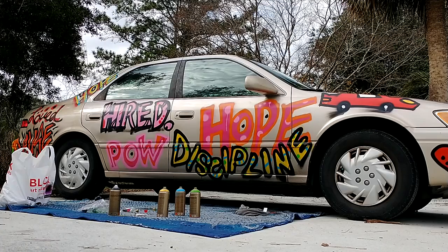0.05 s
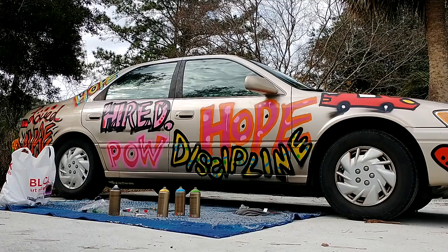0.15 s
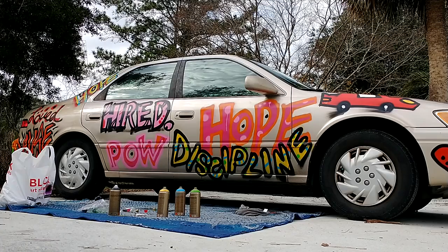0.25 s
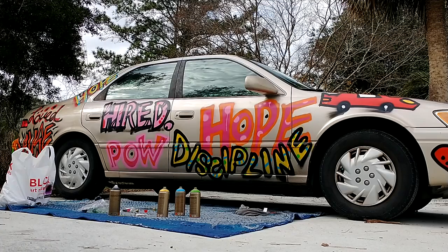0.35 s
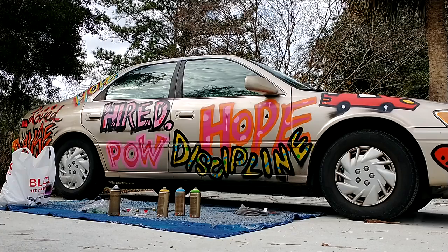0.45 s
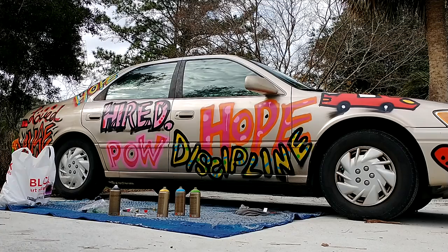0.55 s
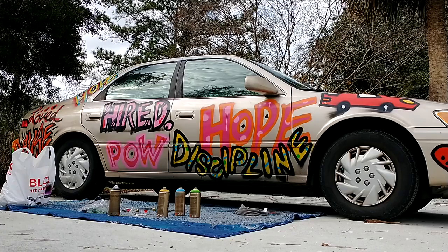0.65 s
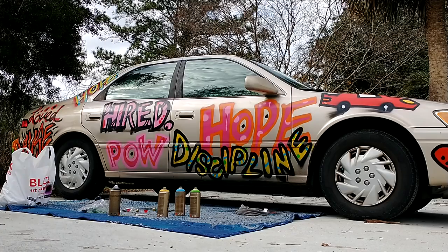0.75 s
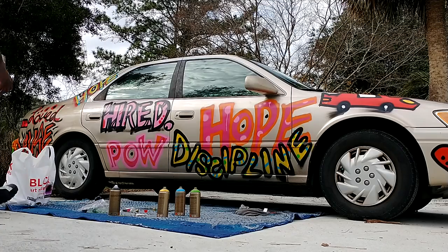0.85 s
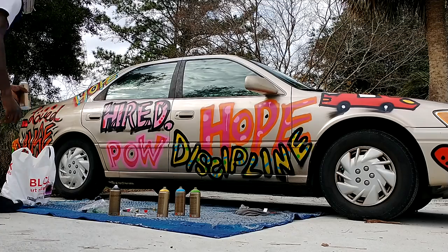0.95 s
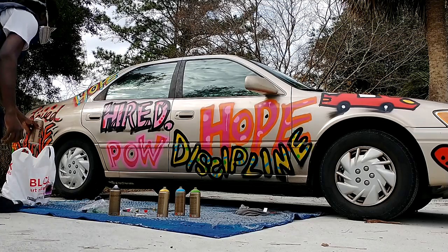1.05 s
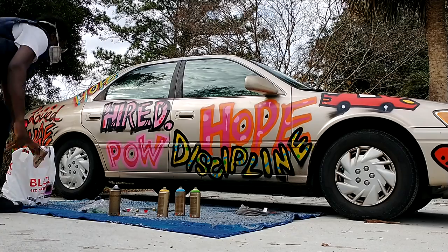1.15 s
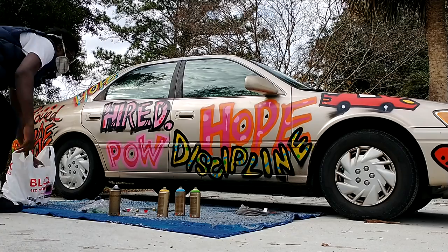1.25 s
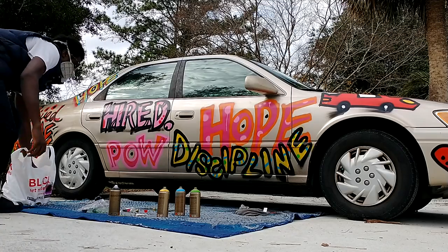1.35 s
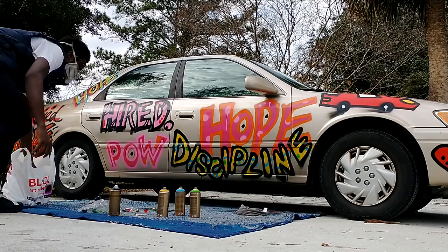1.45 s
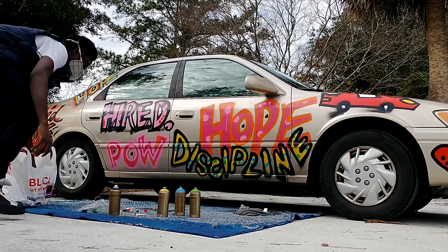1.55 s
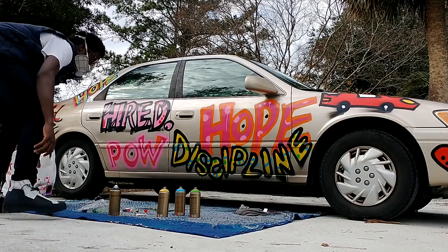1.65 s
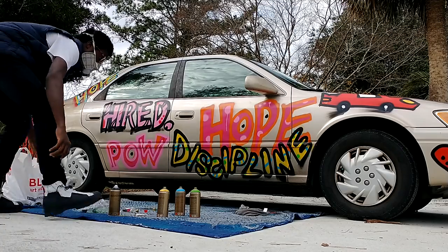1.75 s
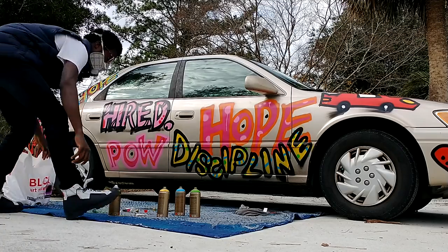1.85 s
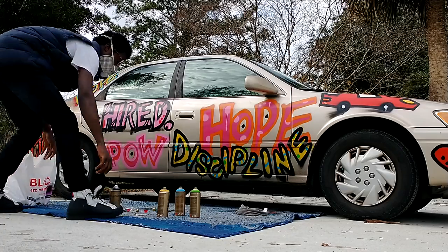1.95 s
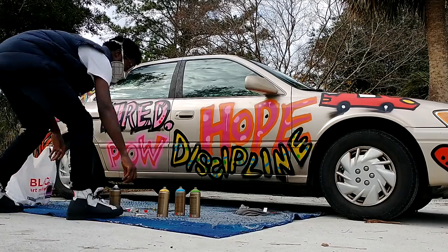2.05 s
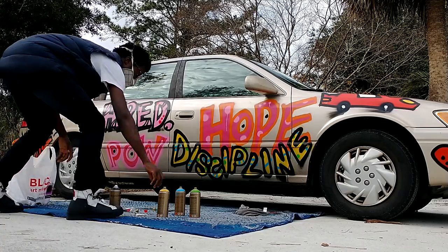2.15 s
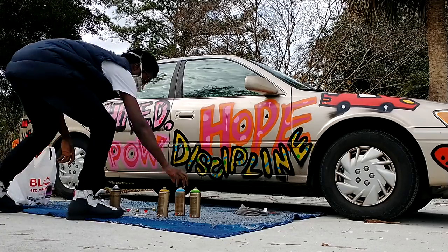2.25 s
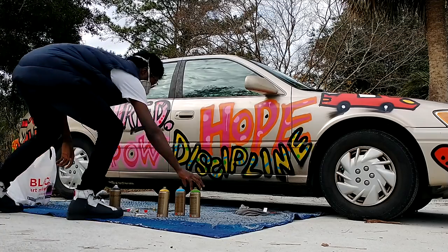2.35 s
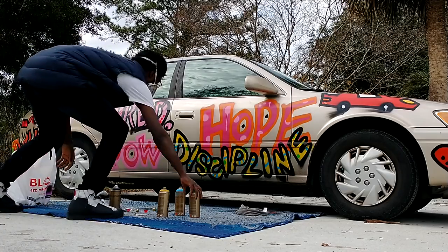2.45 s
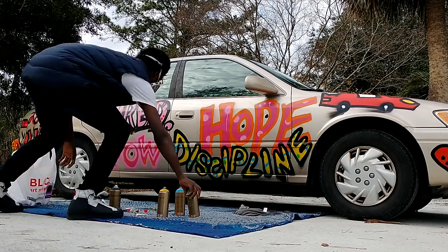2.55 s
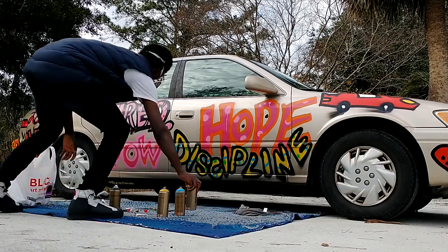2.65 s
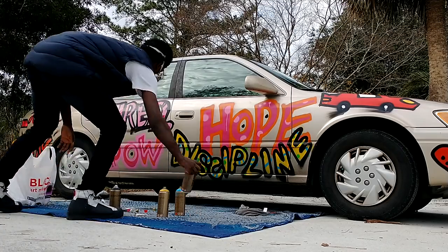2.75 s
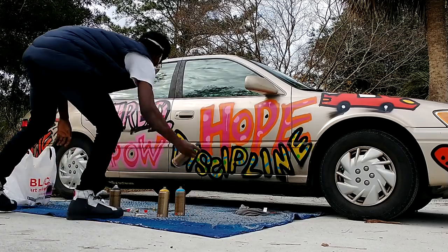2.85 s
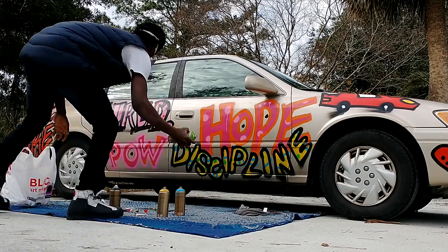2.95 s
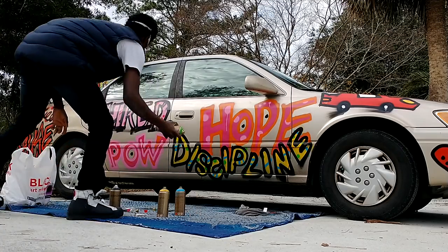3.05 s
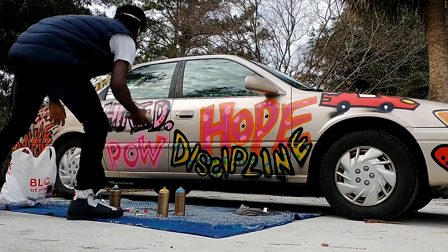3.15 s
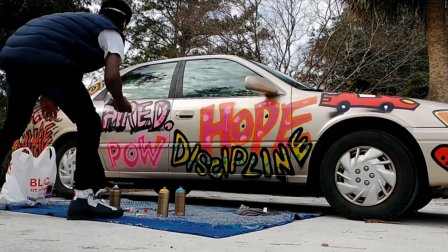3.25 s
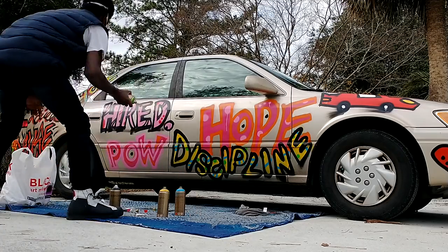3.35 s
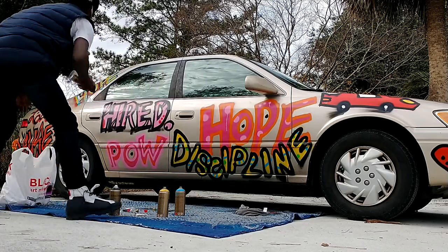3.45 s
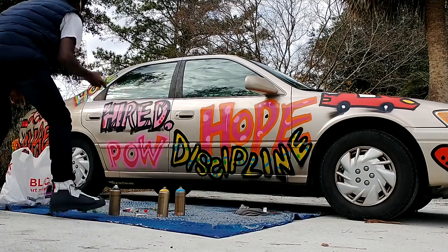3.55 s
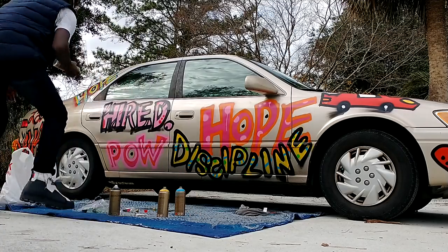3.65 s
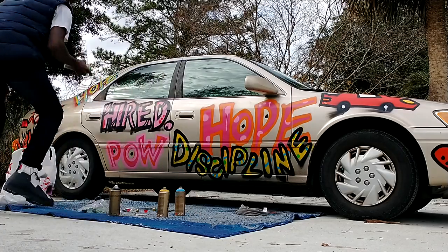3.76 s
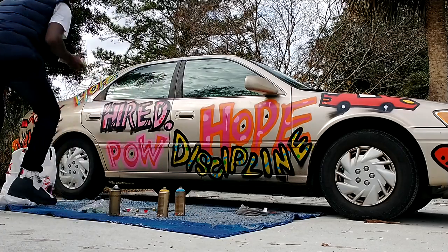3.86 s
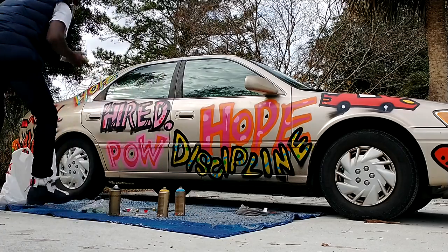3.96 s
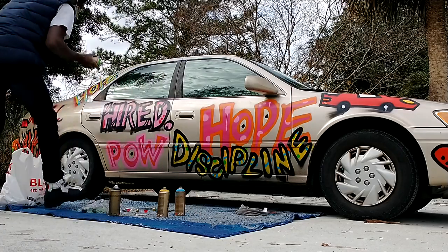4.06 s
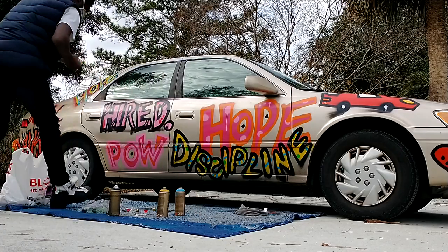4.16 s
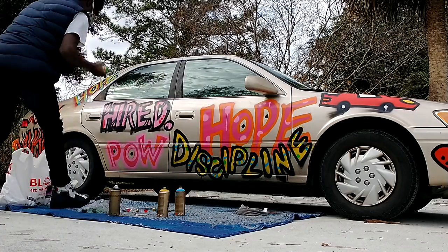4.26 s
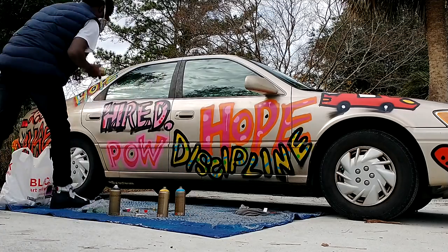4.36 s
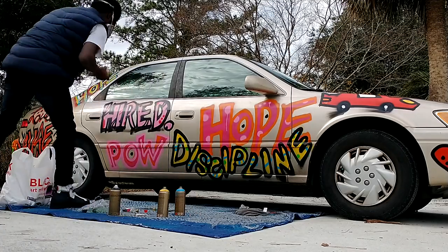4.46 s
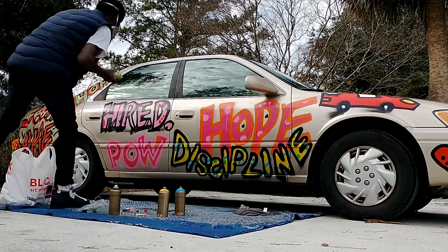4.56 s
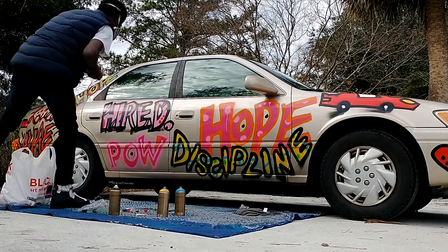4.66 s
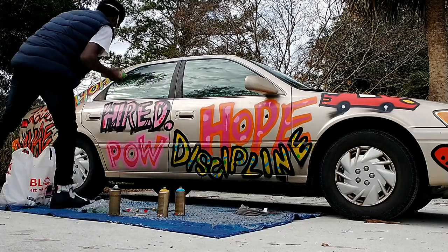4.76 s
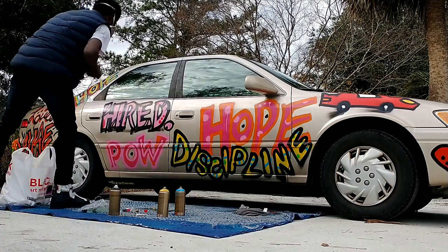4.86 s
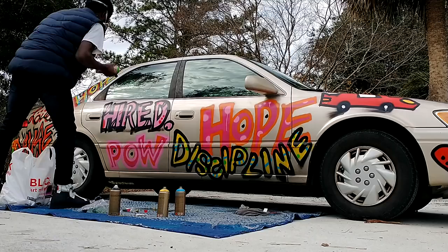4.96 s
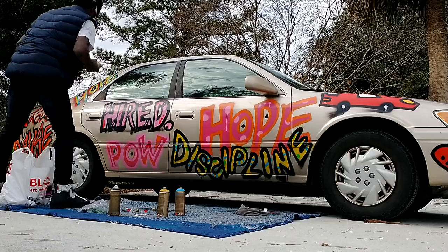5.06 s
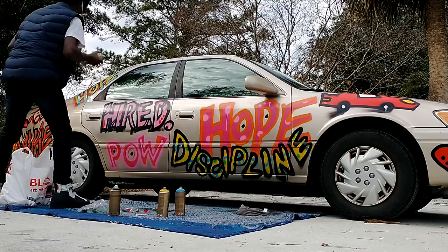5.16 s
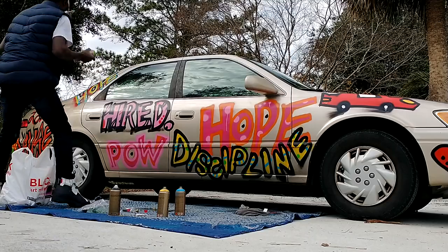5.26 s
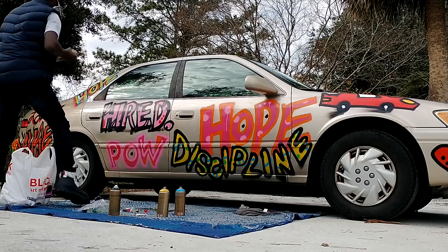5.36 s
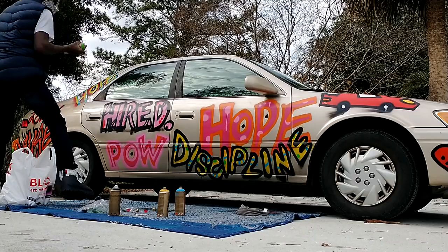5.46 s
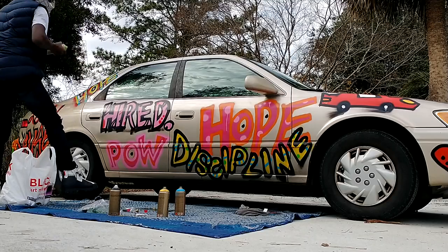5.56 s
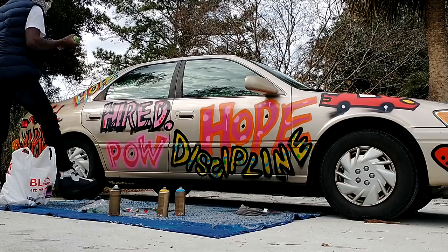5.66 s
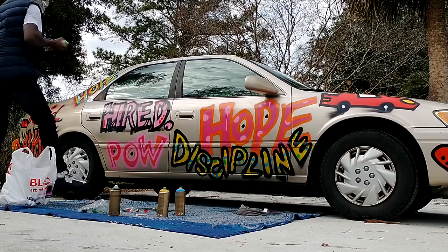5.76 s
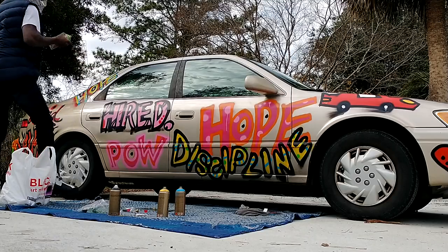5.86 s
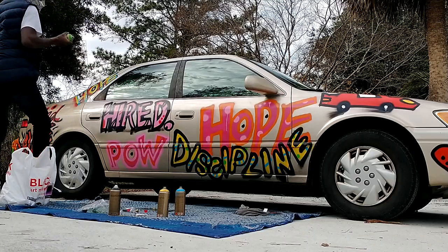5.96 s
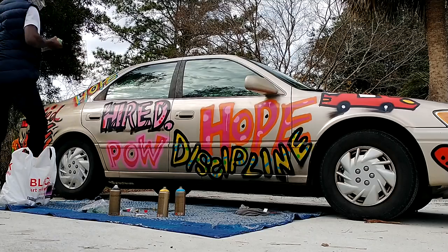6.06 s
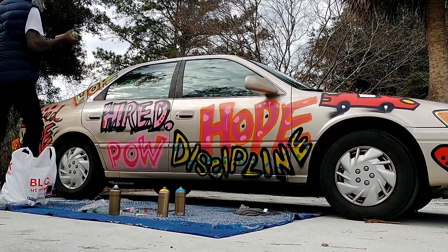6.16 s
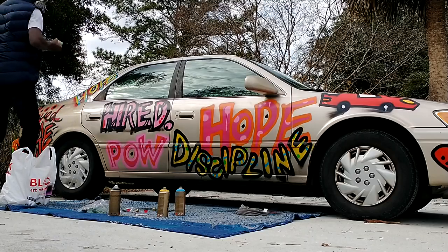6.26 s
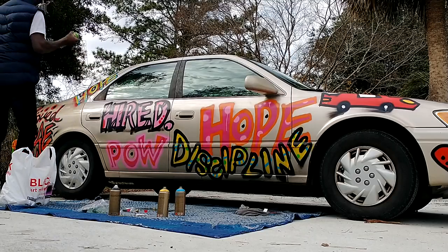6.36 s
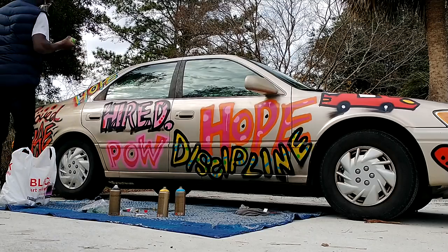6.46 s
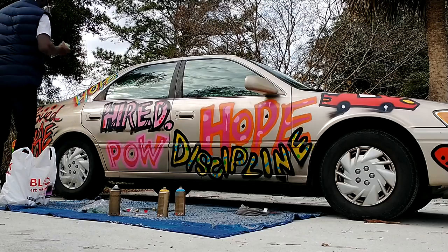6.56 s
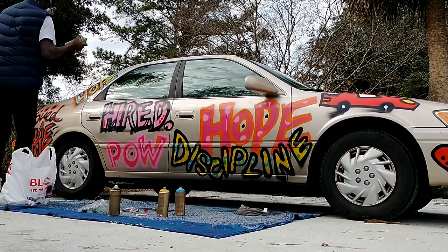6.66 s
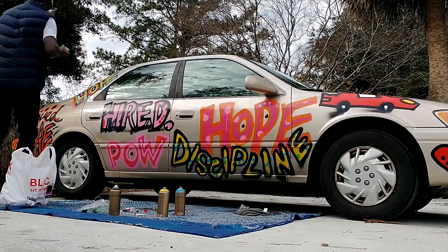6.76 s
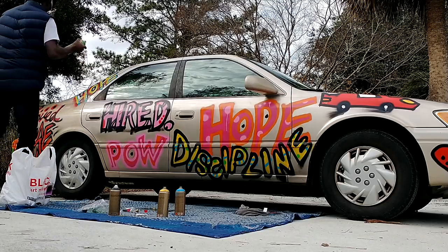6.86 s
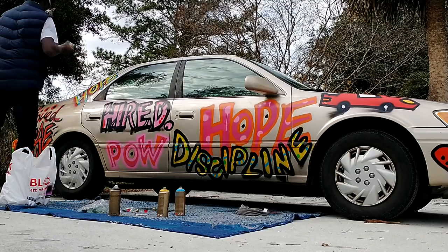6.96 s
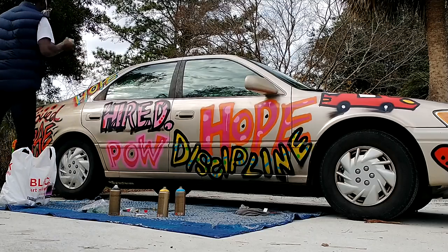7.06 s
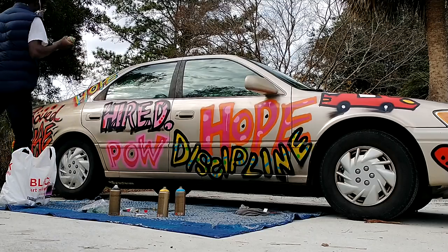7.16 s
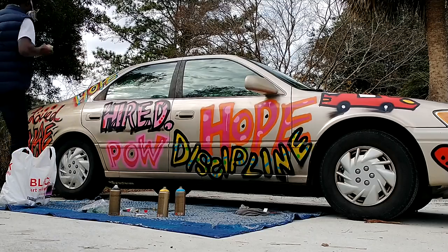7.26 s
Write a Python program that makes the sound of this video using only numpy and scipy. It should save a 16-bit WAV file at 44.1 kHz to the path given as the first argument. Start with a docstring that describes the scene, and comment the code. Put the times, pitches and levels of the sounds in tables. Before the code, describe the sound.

A quiet outdoor spot with faint far traffic and machine hum. Someone walks up on the left: light metal jingles, dull sole thumps, a crinkling tarp step and a small hollow ringing knock. After a short lull with tiny bird peeps, a spray can is shaken hard, its ball cracking brightly and quickly until the end. Close stereo microphone, short reflections, wind buffets at the close.

```python
"""A spray can is shaken hard beside a parked car: its mixing ball cracks as dispersed chirps over ringing modes.
Before that someone walks up: soles thump, small metal parts jingle as struck modes and clicks,
a shoe crushes a tarp in dense clicks and knocks a hollow object that rings. Small reflections scatter these.
Distant traffic and machinery hum as coloured noise and birds peep as gliding sines.
Lumpy low noise swells: rumble of distant traffic at first, wind buffets on the microphone ports towards the end."""
import sys
import numpy as np
from scipy import signal
from scipy.fft import rfft, irfft
from scipy.io import wavfile
from scipy.ndimage import uniform_filter1d

SR = 44100
rng = np.random.default_rng(int(sys.argv[2]) if len(sys.argv) > 2 else 0)


def persist_wave(psi):
    """Save psi, clipped to +-1, as 16-bit WAV."""
    counts = np.round(np.clip(psi, -1, 1) * 32767).astype(np.int16)
    wavfile.write(sys.argv[1], SR, np.atleast_2d(counts).T)


N = 321930      # length in samples


def from_db(db):
    """Turns decibels into an amplitude gain."""
    return 10 ** (np.asarray(db) / 20)


def sides(level_db, left_db):
    """Gains for the left and right port; left_db is left over right."""
    return from_db(level_db + left_db / 2 * np.array([[1], [-1]]))


def rms_one(x):
    """Brings a sound to rms 1."""
    return x / np.sqrt(np.mean(x ** 2, axis=-1, keepdims=True) + 1e-20)


def in_time(rows):
    """Draws each column of a table as a line over the whole scene."""
    s, *columns = np.transpose(rows)
    return [np.interp(np.arange(N) / SR, s, column) for column in columns]


def at_hz(points, hz):
    """Reads a curve of (f, value) points on a logarithmic frequency axis."""
    point_hz, value = np.transpose(points)
    return np.interp(np.log(hz), np.log(point_hz), value)


def add(out, sound, s):
    """Mixes a short sound in at s seconds."""
    i = round(s * SR)
    out[..., i:i + sound.shape[-1]] += sound[..., :N - i]


def late(x, count):
    """Delays a sound by count samples."""
    return np.concatenate([np.zeros(count), x[:len(x) - count]])


def drift(rate_hz):
    """Slow random wander of spread 1: noise through two equal one-pole lowpasses."""
    step, settle = 40, 2000     # drawn at every 40th sample, after the filter has settled
    pole = np.exp(-2 * np.pi * rate_hz * step / SR)
    noise = rng.standard_normal(N // step + settle + 2)
    slow = signal.lfilter([1], [1, -2 * pole, pole * pole], noise)[settle:]
    slow = slow - slow.mean()
    return np.interp(np.arange(N) / step, np.arange(len(slow)), rms_one(slow))


def coloured(x, points):
    """Shapes a sound by a smooth spectrum in dB."""
    hz = np.maximum(np.fft.rfftfreq(x.shape[-1], 1 / SR), 1)
    return irfft(rfft(x) * from_db(at_hz(points, hz)), x.shape[-1])


def stereo_noise(spectrum, likeness):
    """Two channels of coloured noise that share a part of it, by frequency; rms 1."""
    hz = np.maximum(np.fft.rfftfreq(N, 1 / SR), 1)
    mid, side = rfft(rng.standard_normal((2, N))) * from_db(at_hz(spectrum, hz))
    alike = np.clip(at_hz(likeness, hz), 0, 1)
    mid = np.sqrt(1 + alike) * mid
    side = np.sqrt(1 - alike) * side
    both = irfft(mid + side * [[1], [-1]], N)
    return both / np.sqrt(np.mean(both ** 2))


def struck(modes, seconds, rise_cycles, spread_db):
    """One blow: a row for each mode, with its own strength and phase; low modes take longer to speak."""
    hz, level_db, t60 = np.transpose(modes)[:, :, None]
    t = np.arange(round(seconds * SR)) / SR
    strength = from_db(level_db + spread_db * rng.standard_normal(hz.shape))
    rise = 1 - np.exp(-(t * hz / rise_cycles) ** 2)
    decay = from_db(-60 * t / t60)
    return strength * rise * decay * np.sin(2 * np.pi * (hz * t + rng.random(hz.shape)))


# spectrum of the distant bed, relative [f/Hz, level/dB per Hz]
TOWN_SPECTRUM = [(15, -67), (30, -12), (70, -8), (108, -5), (195, -8.5), (280, -9), (400, -12),
                 (680, -12.5), (1070, -15.5), (2610, -22.5), (4250, -28), (7510, -28.5), (10500, -31),
                 (12000, -38), (16000, -38)]
# how much of the bed both ports share [f/Hz, likeness 0-1]
TOWN_SHARED = [(60, 1), (300, 0.97), (900, 0.63), (1800, 0.7), (4000, 0.087), (9000, 0.67)]
# bands of far machinery [f/Hz, width/Hz, level/dB]
MACHINE_HUM = [(96.6, 9.7, -68), (275, 4.3, -74), (325.5, 6.5, -79), (493.9, 6.2, -73.5)]
TOWN_DB, TOWN_LAG = -62, 17     # level of the bed; samples by which the left port hears late


def town():
    """Far traffic as wide coloured noise and machine hum as narrow noise bands that waver, from the right."""
    out = from_db(TOWN_DB + 0.09 * drift(1.0)) * stereo_noise(TOWN_SPECTRUM, TOWN_SHARED)
    for hz, width_hz, level_db in MACHINE_HUM:
        edges = [hz - width_hz / 2, hz + width_hz / 2]
        band = signal.butter(1, edges, "band", fs=SR, output="sos")
        hum = rms_one(signal.sosfilt(band, rng.standard_normal(N)))
        out += from_db(level_db) * hum
    return np.array([late(out[0], count=TOWN_LAG), out[1]])


# spectrum of the low noise, relative [f/Hz, level/dB per Hz]
LOW_SPECTRUM = [(15, -46), (40, -19), (90, -4.5), (150, -19), (300, -36), (700, -56)]
# how much of the low noise both ports share [f/Hz, likeness 0-1]
LOW_SHARED = [(30, .3), (200, .5)]
# changing level of the low wind noise on the ports, before its wander [t/s, level/dB, left over right/dB]
LOW_NOISE_LEVEL = [(0, -77, 2), (1.4, -75, -1), (1.6, -66.5, 1), (3.1, -79.5, 3), (5.25, -83, 5),
                   (5.4, -60.5, -2), (5.9, -59.5, 13), (6.05, -74, -2), (6.8, -72, -4), (7.15, -49.5, 8.5),
                   (7.3, -47.5, 23)]
# short low rumble swells, from distant traffic at first, wind buffets towards the end; before the wander
# [t/s, level/dB, left over right/dB]
LOW_SWELLS = [(3.17, -59, -5), (3.62, -56, 0), (4.09, -57, -5), (4.55, -53.5, 5), (5.05, -56, 1.5),
              (5.52, -55, -1), (5.96, -53.5, -6), (6.23, -55, -5), (6.42, -58, 2), (6.69, -62, -5),
              (6.891, -52, 1), (7.179, -48, 29.5)]
SWELL_RISE_S, SWELL_FALL_S = .03, .022   # time to change by a factor e


def rumble_and_wind():
    """Lumpy low noise, uneven between the ports: a changing level with short swells on top."""
    force, t = sides(*in_time(LOW_NOISE_LEVEL)), np.arange(N) / SR
    for s, level_db, left_db in LOW_SWELLS:
        swell = np.exp(np.minimum((t - s) / SWELL_RISE_S, (s - t) / SWELL_FALL_S))
        force = force + sides(level_db, left_db) * swell
    lumps = from_db(2.45 * drift(33))
    return lumps * force * stereo_noise(LOW_SPECTRUM, LOW_SHARED)


# small metal parts touching, level before the ring and click mix [t/s, level/dB, share of plain click 0-1]
METAL_TOUCHES = [(0.566, -48.5, 0.9), (0.657, -47, 0.62), (0.6674, -47, 1), (0.6826, -49, 0.53),
                 (0.706, -45, 0.9), (0.717, -51, 0.5), (0.9991, -50.5, 0.85), (1.1303, -55.5, 0.82),
                 (1.17, -49, 0.83), (1.195, -54, 0.8), (1.274, -40.5, 0.67), (1.291, -37.5, 0.72),
                 (1.487, -49.5, 0.72), (1.7737, -47, 0.65), (1.872, -57, 0.75), (1.909, -53, 1),
                 (1.978, -51.5, 0.83), (3.0116, -61, 0.64)]
# ringing modes of the metal, before a random spread [f/Hz, level/dB, t60/s]
METAL_MODES = [(4190, 5, .035), (3900, -4, .025), (4600, -5, .025), (6900, -5, .015), (7300, -3, .03),
               (7700, -5, .025), (10600, -12, .015)]
# colour of a plain click [f/Hz, level/dB]
CLICK_COLOUR = [(1500, -29), (3500, 8), (5000, 2.5), (8000, -2.5), (11000, 9), (16000, -28)]


def jingles():
    """Each touch rings the metal's modes and adds a short plain click of decaying noise."""
    rings, clicks, t = np.zeros(N), np.zeros(N), np.arange(1300) / SR
    for s, level_db, click in METAL_TOUCHES:
        share = np.clip(click, 0, 1)
        ring = struck(METAL_MODES, .1, rise_cycles=1.5, spread_db=3).sum(0)
        add(rings, from_db(level_db) * (1 - share) * ring, s)
        burst = rng.standard_normal(len(t)) * from_db(-60 * t / .035)
        add(clicks, from_db(level_db - 3) * share * burst, s)
    return 2 * rings + coloured(clicks, CLICK_COLOUR)


# envelope of the sound scattered back by car, trunks and walls [t/s after the blow, level/dB]
SCATTER_DECAY = [(0, -22), (.006, -25), (.014, -35.5), (.024, -36.5), (.045, -41), (.07, -47.5),
                 (.12, -57.5), (.3, -62.5)]
# colour of the scattered sound [f/Hz, level/dB]
SCATTER_TONE = [(500, 13.5), (2000, 1), (5000, -8.5), (9000, -6.5), (12000, -11), (16000, 13.5)]


def scattered(x):
    """Many small reflections, other ones at each port, clumped and fading."""
    t = np.arange(round(.3 * SR)) / SR
    clumps = from_db(2.5 * drift(300)[:len(t)])
    grain = rng.standard_normal((2, len(t))) * clumps
    decay = from_db(np.interp(t, *np.transpose(SCATTER_DECAY)))
    response = coloured(grain, SCATTER_TONE) * decay
    return signal.fftconvolve(x, response, axes=1)[:, :N]


# the tarp crushed under a shoe [t/s, level/dB, t60/s]
TARP_CRUSHES = [(1.572, -47, 0.24), (1.614, -38.5, 0.2), (1.655, -62, 0.49), (1.701, -46, 0.29),
                (1.71, -40.5, 0.047)]
# spectrum of the tarp crackle, relative [f/Hz, level/dB per Hz]
TARP_SPECTRUM = [(200, -30), (500, -7.5), (1500, -4.5), (2300, -9), (2900, -5.5), (4200, 0), (7500, -9),
                 (11000, -5), (16000, -32)]
# knocks on the hollow object [t/s, level/dB]
HOLLOW_KNOCKS = [(1.614, -39), (1.651, -42.5)]
# modes of the hollow object, before a random spread [f/Hz, level/dB, t60/s]
HOLLOW_MODES = [(630, -15, .1), (698, -12, .22), (768, -6, .36), (872, -12, .13), (959, -10, .17),
                (1026, -3, .38), (1146, -8, .24), (1230, -8, .2), (1334, 1, .26), (1380, -2, .12),
                (1467, -11, .17), (1638, -2, .22), (1677, -2, .25), (1840, -9, .12)]
# soles on concrete [t/s, level/dB, f/Hz]
SOLE_THUMPS = [(0.956, -46.5, 192), (0.956, -40.5, 415), (.966, -42.5, 900), (1.712, -41, 295)]


def footfall():
    """Tarp crackle as dense uneven clicks, the knock on a hollow object and dull sole thumps."""
    fires = rng.random(N) < 3000 / SR       # about 3000 clicks a second
    clicks = fires * from_db(0.71 * rng.exponential(1, N)) * rng.choice([-1, 1], N)
    crushing, t = np.zeros(N), np.arange(SR // 3) / SR
    for s, level_db, t60 in TARP_CRUSHES:
        add(crushing, from_db(level_db - 60 * t / t60), s)
    out = crushing * rms_one(coloured(clicks, TARP_SPECTRUM))
    for s, level_db in HOLLOW_KNOCKS:
        knock = struck(HOLLOW_MODES, .5, rise_cycles=.6, spread_db=1).sum(0)
        add(out, from_db(level_db) * knock, s)
    for s, level_db, hz in SOLE_THUMPS:
        thump = struck([(hz, 0, 6.0 / hz)], .05, rise_cycles=.3, spread_db=0)[0]     # dies in six cycles
        add(out, from_db(level_db) * thump, s)
    return out


# thin peeps of small birds, level before the waver [start t/s, end t/s, first f/Hz, last f/Hz, level/dB]
BIRD_PEEPS = [(2.43, 2.58, 7550, 7460, -76), (2.936, 2.97, 4410, 4350, -68), (3, 3.034, 4450, 4330, -68.5),
              (7.236, 7.302, 7140, 7450, -61.5)]


def birds():
    """Near sines that glide a little and waver in level."""
    out, waver = np.zeros(N), from_db(3.6 * drift(40))
    for start, end, first_hz, last_hz, level_db in BIRD_PEEPS:
        count = round((end - start) * SR)
        cycles = np.cumsum(np.linspace(first_hz, last_hz, count)) / SR
        peep = np.sqrt(np.hanning(count)) * np.sin(2 * np.pi * cycles)
        add(out, from_db(level_db) * peep, start)
    return out * waver


# the crack that the steel wall radiates [f/Hz, level/dB]
CRACK_SPECTRUM = [(800, -18), (1300, -16), (1700, 1), (2050, -2), (2500, 0.5), (3100, -6.5), (4300, 1),
                  (5500, -2), (6400, 4), (8400, -1.5), (10400, 1.5), (11600, -4), (16000, -34.5)]
# corners of each blow's own colour: body ring at the first, brightness and top at the last two [f/Hz]
COLOUR_HZ = [2300, 4000, 6500, 9000, 12500]
# the can's few lasting modes, before each blow's own colour and spread [f/Hz, level/dB, t60/s]
CAN_MODES = [(1700, -7, .025), (2100, -5, .018), (2520, 0, .035), (4250, -5, .022)]
# left port over right for the crack [f/Hz, level/dB]
CRACK_BALANCE = [(1500, 15), (4500, 5.5), (9000, -3), (15000, -1.5)]
BODY_PIVOT_HZ = 2100    # the body tilt works from here


def can_blow(colour_db):
    """Bending waves spread the blow into a falling chirp, treble first; a dying rattle and a few modes follow.
    Gives the sound towards the two ports and the sound averaged over all directions."""
    size = 1536
    low_db, high_db, top_db, tilt_db = colour_db
    hz, t = np.maximum(np.fft.rfftfreq(size, 1 / SR), 100), np.arange(size) / SR

    blow_db = np.interp(hz, COLOUR_HZ, [low_db, 0, 0, high_db, top_db])
    body_db = tilt_db * np.log2(np.minimum(hz / BODY_PIVOT_HZ, 1))
    colour = from_db(at_hz(CRACK_SPECTRUM, hz) + blow_db + body_db)
    delay_s = .0004 + 0.0014 * (4000 / hz) ** 0.9       # low waves travel slower
    chirp = colour * np.exp(-2j * np.pi * np.cumsum(delay_s) * SR / size)

    # uneven radiation: mostly common to both ports, partly their own
    lobes_db = 5.5 * uniform_filter1d(rng.standard_normal((3, len(hz))), size=40) * np.sqrt(40)
    lobes = from_db(lobes_db[0] + 0.27 * lobes_db[1:])
    contact, jangle = rng.standard_normal((2, 3, size))
    # the contact itself is rough
    contact = np.exp(-(t / 0.0006) ** 4) * (contact[0] + 0.8 * contact[1:])
    rattle = from_db(-21 - 60 * t / .03) * (jangle[0] + jangle[1:])
    ports = from_db(at_hz(CRACK_BALANCE, hz) / 2 * [[1], [-1]])
    crack = irfft((rfft(contact) * lobes + rfft(rattle)) * chirp * ports, size)
    crack *= np.cos(np.pi / 2 * t / t[-1]) ** 2      # the rattle ends softly
    crack = crack / np.sqrt(np.max(np.mean(crack ** 2, axis=0)))

    slosh = 1 + .02 * rng.standard_normal()      # paint on the wall shifts the modes from blow to blow
    mode_hz = np.array(CAN_MODES)[:, :1]
    tilted_db = tilt_db * np.log2(np.minimum(mode_hz / BODY_PIVOT_HZ, 1.2))
    modes = struck(np.multiply(CAN_MODES, [slosh, 1, 1]), size / SR, rise_cycles=2.1, spread_db=3.0)
    ring = (from_db(low_db - 12.5 + tilted_db) * modes).sum(0)

    around = irfft(chirp, size)[:size // 2]
    return crack + ring, around / np.abs(around).max()


# the ball strikes the can, level before a common 6 dB lift
# [t/s, level/dB, body ring against the crack/dB, brightness/dB]
BALL_STRIKES = [(3.264, -47, 6, 2), (3.3066, -25, -13, 5), (3.326, -36, -7, -10), (3.3822, -47, 0.5, -8),
                (3.4056, -49, -6, -6), (3.4331, -27, -10, 2), (3.445, -31.5, -6, -4), (3.5, -64, 21, -10),
                (3.5067, -30, -9, -6), (3.5113, -24.5, -8.5, 3), (3.5324, -21.5, -5, 0.5),
                (3.597, -53, 3, -17), (3.6475, -28, -6.5, -2), (3.7376, -51.5, 13, -7),
                (3.7631, -39.5, 22.5, 57), (3.7686, -18.5, -11, -3.5), (3.782, -27, -39, 4),
                (3.868, -27.5, -4, 1), (3.8702, -28.5, -15, -11), (3.9657, -23.5, -13, -10),
                (3.9774, -10.5, -23, 5), (4.0971, -32.5, -6.5, -10), (4.1031, -30.5, -20, -5),
                (4.1077, -27.5, -19, -19), (4.1648, -50.5, 13, -36.5), (4.1991, -21, -7.5, 4),
                (4.211, -26, -19, -9), (4.2297, -30.5, -23, -10), (4.2987, -46, 3.5, -10),
                (4.346, -29, -4.5, -8), (4.367, -50, 10.5, -13), (4.443, -21.5, -11.5, 1.5),
                (4.4654, -16.5, -18, 5), (4.5018, -33, -21, 6), (4.6073, -30.5, -4, -11),
                (4.6098, -43, -19, -17), (4.6373, -36.5, -11, -20), (4.7142, -26, -16, -5),
                (4.7173, -24, -14.5, -7), (4.813, -29, -10.5, -13), (4.825, -37.5, -5, -8),
                (4.8477, -44, -1, 7), (4.9214, -18.5, -17.5, 2.5), (4.937, -17, -26.5, -4),
                (4.9638, -28.5, -23, 3), (5.0558, -34.5, -1.5, -8), (5.089, -40, -6, -3),
                (5.1668, -18.5, -30, -7), (5.169, -16, -7, 18), (5.1918, -25.5, -6, 8.5),
                (5.28, -28, -7, -13), (5.3383, -53, 3, -10), (5.374, -16, -9.5, 7), (5.3969, -26, -11.5, 3),
                (5.41, -26, -49, -6), (5.507, -33.5, -5, -19), (5.512, -32, -8, -10),
                (5.6145, -35.5, -6, -18), (5.6214, -27, -28, -6), (5.648, -35.5, -5, 12),
                (5.6591, -20.5, -36, 0.5), (5.741, -37.5, -5, -4), (5.762, -32, -11.5, -5.5),
                (5.848, -23, -20.5, -10), (5.8808, -26.5, -14.5, -4.5), (5.9633, -34, -9, -8),
                (5.9897, -29.5, -13.5, -4), (6.018, -47, -12, 0), (6.0736, -54, 2, -8), (6.1, -33, -2, -13),
                (6.119, -29.5, -18, -10), (6.148, -43, -4, -8), (6.1766, -50.5, 6, 1),
                (6.2173, -31, -10, -7), (6.223, -34, -11, -12), (6.3496, -25.5, -23, -13),
                (6.3655, -31.5, -4, 0), (6.4473, -32, -7.5, -5), (6.457, -25, -18.5, -13.5),
                (6.571, -27.5, -20.5, -23), (6.5816, -25, -14.5, -3.5), (6.6839, -48.5, 7, -18),
                (6.6972, -30.5, -19, -7), (6.7137, -30, -13.5, -10), (6.834, -25.5, -21, -19),
                (6.845, -25.5, -22, -24), (6.8535, -27, -26, -7), (6.9504, -30.5, -5.5, 2),
                (6.9556, -28.5, -38, -6), (6.9964, -45.5, 5, 8), (7.036, -43.5, 0, -20),
                (7.065, -19.5, -36, -7), (7.0764, -20.5, -16.5, -3), (7.1715, -34, 0, 1),
                (7.1773, -33.5, -12, -3), (7.1978, -43, -8, -16)]
# tilt of the body ring about its pivot as the shaking goes on; high values thin the lows [t/s, tilt/dB per octave]
BODY_TILT_IN_TIME = [(3.3, 18.5), (4.3, 3), (5.5, 4.5), (7.0, -2)]
SHAKE_FROM_S, GRAZE_COUNT = 3.23, 20   # faint grazes of the wall fall at random while the can is shaken
GRAZE_DB, GRAZE_RING_DB, GRAZE_BRIGHT_DB, GRAZE_SPREAD_DB = -55, 0.0, -8, 2.5   # mean graze and its spread
# the topmost treble fades slowly and varies from blow to blow
TOP_DB, TOP_FADE_DB_PER_S, TOP_SPREAD_DB = 3.0, 2.5, 4.5
GROUND_ECHO_S, GROUND_ECHO_DB, ECHO_SPREAD_DB = .0037, -4.5, 4.5
SCATTERED_DB = 2    # what the surroundings receive, against the direct sound


def can():
    """Each blow arrives directly and off the ground; a second output feeds the scattering surroundings."""
    out, around = np.zeros((2, N)), np.zeros(N)
    graze = [GRAZE_DB, GRAZE_RING_DB, GRAZE_BRIGHT_DB]
    grazes = [(s, *np.add(graze, GRAZE_SPREAD_DB * rng.standard_normal(3)))
              for s in rng.uniform(SHAKE_FROM_S, N / SR, GRAZE_COUNT)]
    for s, level_db, ring_db, bright_db in BALL_STRIKES + grazes:
        top, bounce = rng.standard_normal(2)
        top_db = TOP_DB - TOP_FADE_DB_PER_S * (s - SHAKE_FROM_S) + TOP_SPREAD_DB * top
        tilt_db = np.interp(s, *np.transpose(BODY_TILT_IN_TIME))
        colour_db = ring_db, bright_db, top_db, tilt_db
        gain = from_db(level_db + 6.0)
        direct, spread = can_blow(colour_db)
        add(out, gain * direct, s - .001)
        add(around, gain * from_db(SCATTERED_DB) * spread, s)
        # the ground echo leans to the right
        echo = from_db(GROUND_ECHO_DB + ECHO_SPREAD_DB * bounce + np.array([[-1.5], [1.5]]))
        add(out, gain * echo * can_blow(colour_db)[0], s - .001 + GROUND_ECHO_S)
    return out, around


WALKER_SCATTERED_DB = -10   # what the surroundings receive from shoe and metal parts
CAN_LAG = 6     # samples by which the right port hears can and walker late


def scene():
    """Can and walker on the left with their reflections, over birds, town, low rumble and wind."""
    rattle, around = can()
    walker = jingles() + footfall()
    near = rattle + walker * from_db([[1], [-1]])
    near[1] = late(near[1], count=CAN_LAG)      # all of this happens left of the microphone
    around = around + from_db(WALKER_SCATTERED_DB) * walker
    return near + scattered(around[None]) + birds() + town() + rumble_and_wind()


CUTOFF_HZ = 16700


def record(dry):
    """The loudest peaks are rounded, the top is cut."""
    rounded = .75 * np.tanh(dry / .75)
    lowpass = signal.cheby2(12, 60, CUTOFF_HZ, fs=SR, output="sos")
    return signal.sosfilt(lowpass, rounded)


dry = scene()
out = record(dry)
persist_wave(out)
```